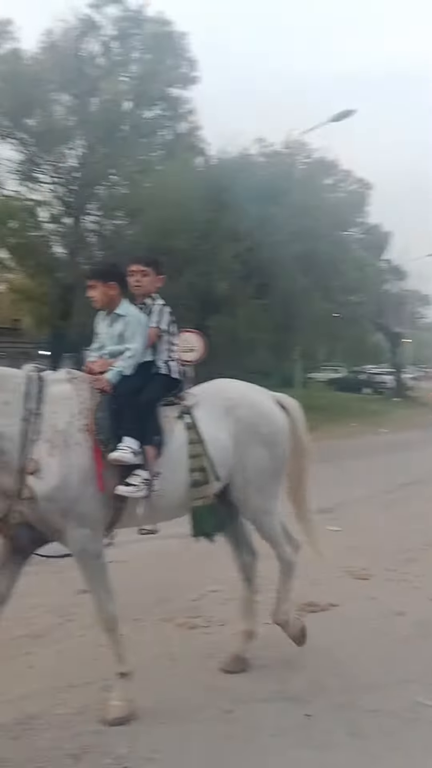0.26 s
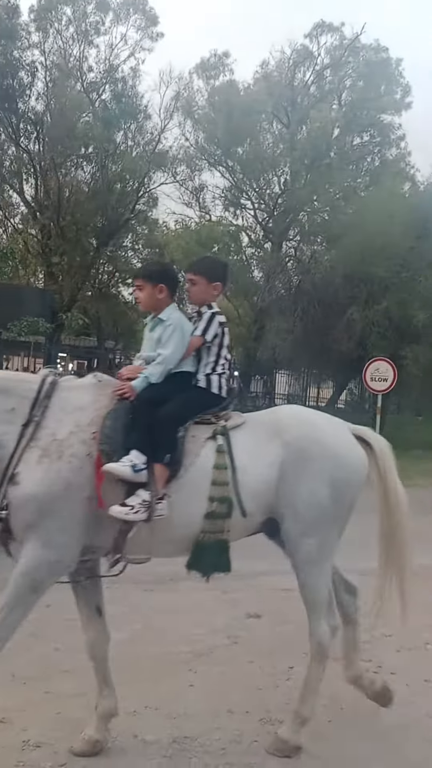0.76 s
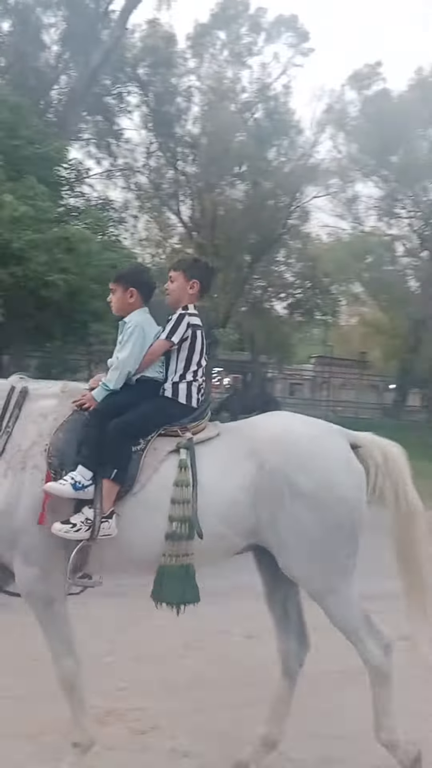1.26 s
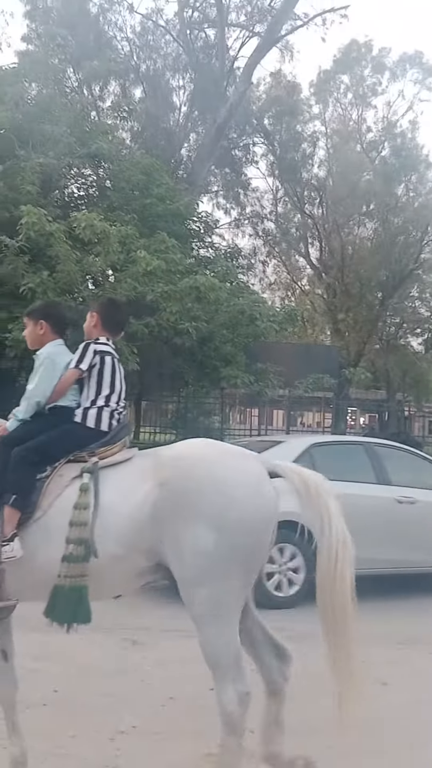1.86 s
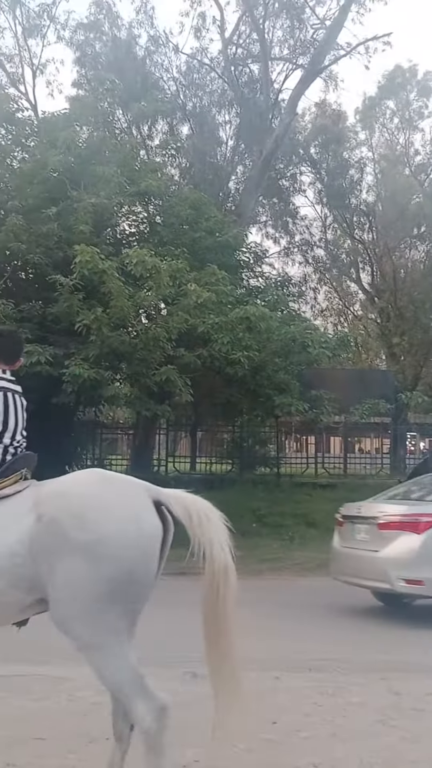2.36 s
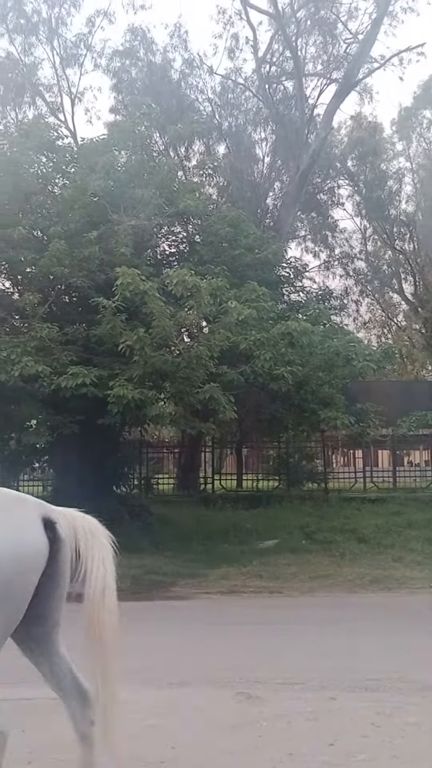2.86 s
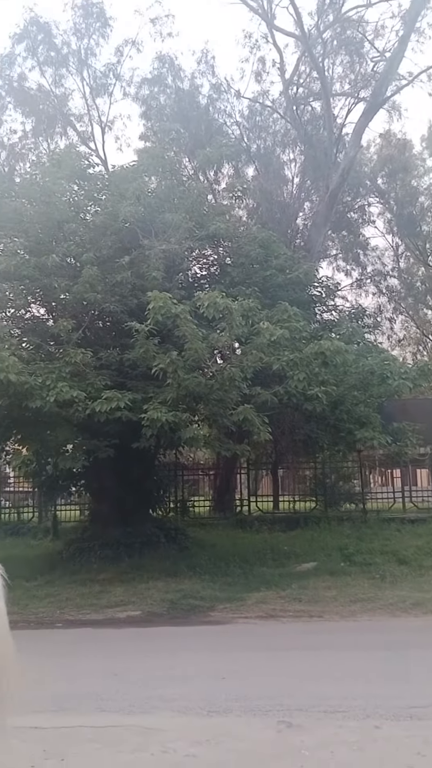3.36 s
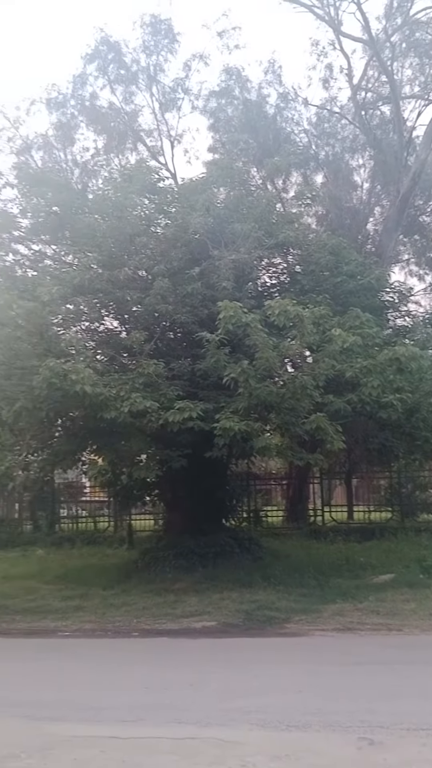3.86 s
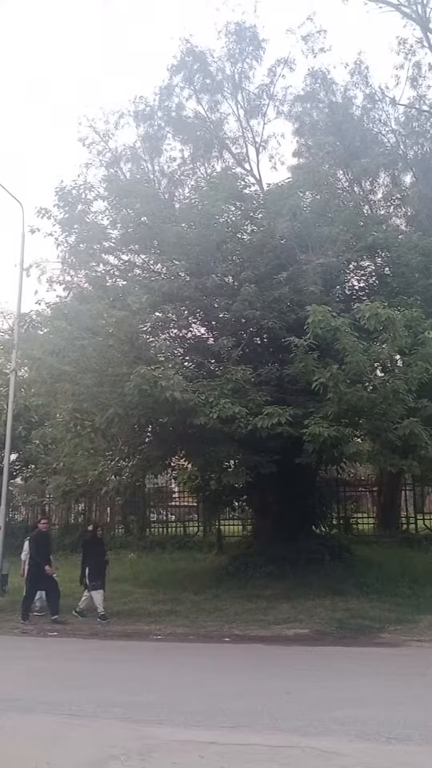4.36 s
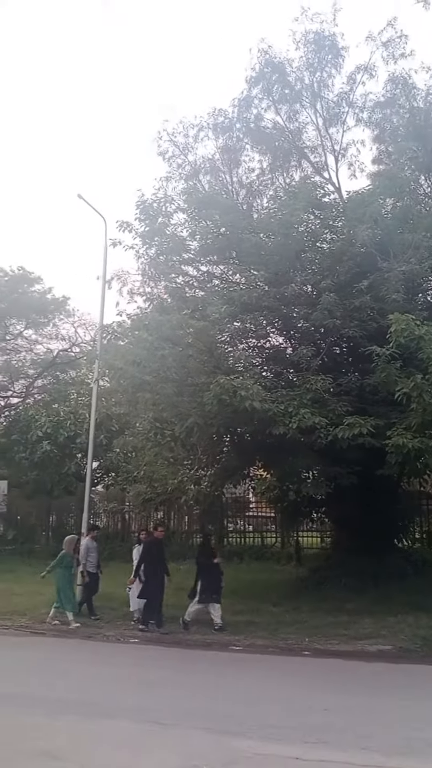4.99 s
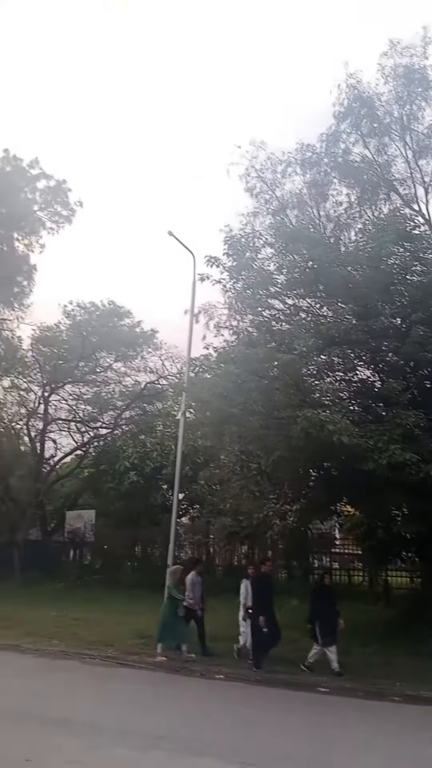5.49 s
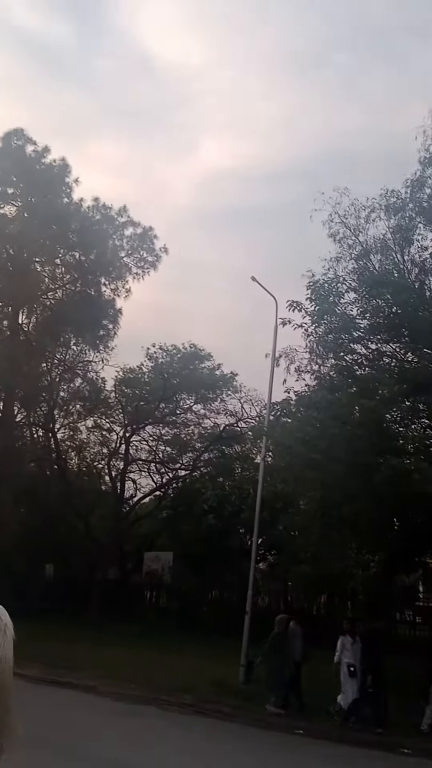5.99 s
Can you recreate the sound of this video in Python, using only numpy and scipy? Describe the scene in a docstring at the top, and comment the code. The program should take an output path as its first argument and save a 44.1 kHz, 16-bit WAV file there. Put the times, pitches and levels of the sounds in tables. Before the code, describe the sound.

A horse's hooves knock and scuff on gritty ground nearby while a slow engine throbs and fades and a car hisses past.

```python
"""A slow one-cylinder engine throbs along a park road, each firing a puff that rings its exhaust,
over the roar of car tyres and a far rumble. From the first moment a walking horse knocks its hooves
and scuffs grit close to the phone. After about a second a car rolls by with a climbing hiss, then
a faint whine. The throb slows, blurs and fades as the engine draws away, and from about four seconds
on the horse's steps clack faintly, farther off."""
import sys
import numpy as np
from scipy import signal
from scipy.fft import rfft, irfft
from scipy.io import wavfile
from scipy.ndimage import uniform_filter1d, map_coordinates

SR = 44100
rng = np.random.default_rng(int(sys.argv[2]) if len(sys.argv) > 2 else 0)


def persist_wave(psi):
    """Save psi, clipped to +-1, as 16-bit WAV."""
    counts = np.round(np.clip(psi, -1, 1) * 32767).astype(np.int16)
    wavfile.write(sys.argv[1], SR, np.atleast_2d(counts).T)


N = 274986


def gain_of(db):
    """Turns decibels into a number to multiply by."""
    return 10 ** (np.asarray(db) / 20)


def evened(x):
    """Scales a signal to an average strength (rms) of 1."""
    return x / np.sqrt(np.mean(x ** 2) + 1e-20)


def colour_at(colour, hz):
    """The gain at each frequency for a colour: a table of how strong the lows and highs are."""
    f, db = np.transpose(colour)
    return gain_of(np.interp(np.log(hz + 1), np.log(f + 1), db, -100, -100))


def follow(rows, t):
    """Draws straight lines between a table's rows: one curve per column, at times t."""
    times, *columns = np.transpose(rows)
    return [np.interp(t, times, column) for column in columns]


def add(mix, start, sound):
    """Mixes a sound in at a start time in seconds."""
    part = mix[round(start * SR):][:len(sound)]
    part += sound[:len(part)]


def fade_in(t, rise):
    """A smooth start that takes about `rise` seconds."""
    return 1 - np.exp(-(t / rise) ** 2)


def ring(x, hz, width):
    """A resonance: keeps the sound near one pitch, which may slide."""
    turn = np.exp(2j * np.pi * np.cumsum(hz * np.ones(len(x))) / SR)
    decay = np.exp(-np.pi * width / SR)
    return (turn * signal.lfilter([1 - decay], [1, -decay], x / turn)).real


def pitched_noise(length, hz, width):
    """Noise rung twice at one pitch becomes a rough, wavering tone."""
    return evened(ring(ring(rng.standard_normal(length), hz, width), hz, width))


def coloured(x, colour, lo, hi):
    """The part of x between lo and hi Hz, given a colour and evened."""
    hz = np.fft.rfftfreq(len(x), 1 / SR)
    return evened(irfft(rfft(x) * colour_at(colour, hz) * (hz >= lo) * (hz < hi), len(x)))


# How much a noise flickers at each pitch: (frequency [Hz], depth at scale 1 [dB])
FLICKER_DEPTH = [(300, 7), (1000, 2.5), (3000, 5.5), (7000, 9.5), (15000, 4.5)]
def mottled(x, scale):
    """Makes narrow bands of a sound swell and sink for a few hundredths of a second."""
    hz, _, spectrum = signal.stft(x, SR, nperseg=512, noverlap=384)
    streaks = rng.standard_normal(spectrum.T.shape).T
    streaks = evened(uniform_filter1d(uniform_filter1d(streaks, size=2, axis=0), size=12, axis=1))
    depth_db, = follow(FLICKER_DEPTH, hz)
    spectrum *= gain_of(scale * depth_db[:, None] * streaks)
    out = signal.istft(spectrum, SR, nperseg=512, noverlap=384)[1][:len(x)]
    return out * np.sqrt(np.mean(x ** 2) / np.mean(out ** 2))


def drifting_noise(colour, bands, levels, size, patchy_db, flicker_db):
    """Coloured noise; each band follows its own level column, with random patches and flicker."""
    frames, hz = 4 * N // size + 5, np.fft.rfftfreq(size, 1 / SR)
    real, imag, patches = rng.standard_normal((frames, len(hz), 3)).T
    patches = evened(uniform_filter1d(uniform_filter1d(patches, size=7, axis=0), size=9, axis=1))
    flicker = evened(uniform_filter1d(rng.standard_normal(frames), size=4))
    gains = colour_at(colour, hz)
    own_db = [10 * np.log10(np.sum(gains[(hz >= lo) & (hz <= hi)] ** 2)) for lo, hi in bands]
    lift_db = np.array(follow(levels, np.arange(frames) * size / 4 / SR)) - np.c_[own_db]
    place = np.interp(hz, np.ravel(bands), np.repeat(np.arange(len(bands)), 2))
    blend = np.clip(1 - abs(place[:, None] - np.arange(len(bands))), 0, 1)  # fades from band to band
    level_db = blend @ lift_db + patchy_db * patches + flicker_db * flicker
    spectrum = (real + 1j * imag) * gains[:, None] * gain_of(level_db)
    return signal.istft(spectrum, nperseg=size, noverlap=3 * size // 4)[1][:N]


def blows(rows, rise, roughness, spread):
    """Each blow is a tone roughened by noise of like pitch; it drops 60 dB in its fade time."""
    out, t = np.zeros(N), np.arange(SR // 3) / SR
    for start, db, hz, fade in rows:
        tone = np.sin(2 * np.pi * hz * t) + roughness * pitched_noise(len(t), hz, spread * hz)
        add(out, start, gain_of(db - 60 * t / fade) * tone * fade_in(t, rise))
    return out


def swells(rows):
    """Each row is a pitched noise that swells and dies away."""
    out = np.zeros(N)
    for start, end, hz, width, db in rows:
        tone = pitched_noise(round((end - start) * SR), hz, width)
        add(out, start, gain_of(db) * tone * signal.windows.tukey(len(tone), .6))
    return out


# How fast the throb is as the engine passes and draws away: (time [s], firing rate [Hz])
THROB_RATE = [(0, 27.56), (.36, 27.56), (.82, 27.62), (1.0, 28), (1.58, 27.77), (2.0, 27.55), (2.4, 27.17),
              (3.25, 26.45), (4.3, 26.09), (6.24, 24.43)]
# The exhaust's level, dipping briefly now and then: (time [s], low boom [dB], higher bark [dB])
EXHAUST_LEVELS = [(0, -29, -58), (.21, -31.5, -46.5), (.33, -27.5, -42), (.82, -28, -34),
                  (.97, -30.5, -36.5), (1.58, -37, -40.5), (1.93, -37, -43), (2.0, -58, -43),
                  (2.07, -36, -46), (2.27, -37.5, -42.5), (2.4, -43, -55), (2.52, -36, -44),
                  (2.68, -42, -50.5), (2.82, -35.5, -52), (2.91, -43.5, -48.5), (3.2, -37, -45.5),
                  (3.33, -52, -49), (3.51, -41.5, -47), (3.64, -44.5, -54), (3.72, -72, -58.5),
                  (3.87, -49.5, -55.5), (3.92, -64, -60), (4.1, -42, -45.5), (4.19, -67, -64),
                  (4.28, -53, -59.5), (4.49, -71.5, -49.5), (4.55, -50, -73), (4.62, -67, -81),
                  (4.69, -56, -46), (4.79, -45, -73), (4.86, -75, -82), (4.93, -38.5, -74), (5.0, -66, -82),
                  (6.24, -74, -84)]
# How the exhaust rings, boom then bark: (pitch [Hz], width [Hz], delay [s], ease of blurring [factor])
EXHAUST_RINGS = [(139.4, 20.6, 0.01296, 0.61), (317.8, 35.5, 0.01104, 1.17)]
def engine():
    """One puff per firing rings the exhaust; the valves rustle in step; distance blurs the beat."""
    t, f = np.arange(N) / SR, np.fft.rfftfreq(N, 1 / SR)
    rate_hz, = follow(THROB_RATE, t)
    boom_db, bark_db = follow(EXHAUST_LEVELS, t)
    cycles = 0.058 + np.cumsum(rate_hz) / SR
    strength = -gain_of(0.7 * rng.standard_normal(200))[cycles.astype(int)]
    fires = np.diff(np.floor(cycles), prepend=-1) > 0
    puffs = evened(strength * fires)
    puffs = evened(puffs + 0.11 * np.roll(puffs, round(0.01437 * SR)))  # an echo behind each beat
    blur = 0.045 + 0.2 * np.maximum(t - 0.9, 0)  # echo noise takes over as the engine leaves
    noise = rng.standard_normal(N)
    rings = []
    for hz, width, delay, ease in EXHAUST_RINGS:
        noise_share = np.clip(ease * blur, 0, 1)
        drive = np.sqrt(1 - noise_share) * puffs + np.sqrt(noise_share) * noise
        # many chambers in a row: each beat swells and dies roundly
        chambers = np.exp(-.5 * ((f - hz) / width) ** 2 - 2j * np.pi * f * delay)
        rings.append(evened(irfft(rfft(drive) * chambers, N)))
    boom, bark = rings
    pulse = np.exp(0.59 * np.cos(2 * np.pi * (cycles - .15)))
    # the rustle and rasp borrow the colours of the grit and tyres below
    rustle = evened(pulse * coloured(mottled(rng.standard_normal(N), 1.2), GRIT_COLOUR, 2600, 14000))
    rasp = evened(pulse * coloured(rng.standard_normal(N), TYRE_COLOUR, 700, 3000))
    body = boom + gain_of(-47.0) * rustle + gain_of(-31.5) * rasp
    return gain_of(boom_db) * body + gain_of(bark_db) * bark


# The colour of tyre noise: (frequency [Hz], relative level [dB])
TYRE_COLOUR = [(240, -47.5), (400, -14), (772, -32), (972, -1), (1100, -2), (1190, -6.5), (1540, 3),
               (1850, 1), (2250, -14.5), (2970, -25.5), (4770, -63.5), (5480, -40), (7790, -20.5),
               (9350, -43.5), (15500, -48.5)]
# The four bands of tyre noise, low to high: (from [Hz], to [Hz])
TYRE_BANDS = [(800, 1280), (1350, 2150), (2300, 3500), (6000, 9500)]
# Their levels: (time [s], roar [dB], tread hiss [dB], near-car hiss [dB], fine hiss [dB])
TYRE_LEVELS = [(0, -46.5, -47.5, -68.5, -93), (0.401, -48.5, -50, -69, -90), (.9, -44, -50, -65.5, -75),
               (1.3, -42.5, -48, -63, -69), (2.2, -51.5, -49, -63, -73), (3.149, -45.5, -47.5, -63, -78),
               (3.629, -48, -50.5, -68.5, -87), (4.4, -52.5, -50.5, -74, -83),
               (6.24, -45, -45.5, -76.5, -74.5)]
def tyres():
    """Car tyres rolling on the road make a flickering roar and hiss."""
    roar = drifting_noise(TYRE_COLOUR, TYRE_BANDS, TYRE_LEVELS, size=512, patchy_db=0.5, flicker_db=-1.63)
    return mottled(roar, 0.88)


def ground_echo(x, delay_s=0.0028, wander_s=0.458, strength=.55):
    """The ground's echo cancels some pitches; they shift as the cars move and its delay changes."""
    wander = rng.standard_normal(N)
    for _ in range(2):
        wander = uniform_filter1d(wander, size=round(wander_s * SR))
    delay = delay_s * SR * np.exp(0.1835 * evened(wander - wander.mean()))
    echo = map_coordinates(x, [np.arange(N) - delay], order=3)
    return (x + strength * echo) / np.sqrt(1 + strength ** 2)


# The colour of far traffic and light wind: (frequency [Hz], relative level [dB])
RUMBLE_COLOUR = [(12, -53), (20, -33.5), (129, -3), (189, -10), (293, 0), (428, -9.5), (554, -6.5),
                 (706, -13.5), (750, -8), (980, -60.5), (1650, -120)]
# The rumble's level in three bands: (time [s], deep [dB], middle [dB], upper [dB])
RUMBLE_LEVELS = [(0, -51, -59.5, -63), (1.2, -53, -57, -65.5), (2.2, -67, -63, -69), (3.4, -62.5, -70, -73),
                 (4.84, -75.5, -73, -68.5), (6.24, -64, -76, -69)]
def far_rumble():
    """Far traffic and light wind blend into a low, uneven noise."""
    bands_hz = [(30, 69), (190, 194.6), (410, 1700)]
    return drifting_noise(RUMBLE_COLOUR, bands_hz, RUMBLE_LEVELS, size=2048, patchy_db=3.5, flicker_db=3.0)


# The colour of the microphone's hiss: (frequency [Hz], relative level [dB])
MICROPHONE_COLOUR = [(1940, -22), (3300, 1.5), (4690, -2), (7810, -5), (9250, -23.5), (9940, -3.5),
                     (15700, -38)]
def microphone_hiss(top_db=-96.5):
    """The microphone adds a steady thin hiss; top_db sets the part above 9.5 kHz."""
    hz = np.fft.rfftfreq(N, 1 / SR)
    gains = colour_at(MICROPHONE_COLOUR, hz)
    gains /= np.sqrt(np.mean((gains * (hz > 9500)) ** 2))
    return gain_of(top_db) * irfft(rfft(rng.standard_normal(N)) * gains, N)


# The colour of grit, loose or scuffed: (frequency [Hz], relative level [dB])
GRIT_COLOUR = [(1180, -22), (2000, 15), (2320, -3), (3030, 6), (3510, -7.5), (4140, -7.5), (4710, -33),
               (5500, -20), (7200, -7.5), (9300, -17), (10200, -14.5), (11300, -18), (12700, -15.5),
               (14200, -25), (15900, -34)]
# The hiss of loose grit: (from [Hz], to [Hz], starting level [dB], change [dB/s])
LOOSE_GRIT_BANDS = [(6980, 10000, -69, -5), (9500, 15500, -79, -5.5)]
def loose_grit(shifts_per_s=12):
    """Loose grit shifts with a soft hiss and small random swells, fading as the horse walks off."""
    t = np.arange(N) / SR
    shifts = (rng.random(N) < shifts_per_s / SR) * gain_of(1.5 * np.minimum(rng.exponential(1, N), 3))
    swell = signal.oaconvolve(shifts, np.hanning(1400))[:N]
    hiss = (.6 + swell) * mottled(rng.standard_normal(N), .9)
    return sum(gain_of(db + db_per_s * t) * coloured(hiss, GRIT_COLOUR, lo, hi)
               for lo, hi, db, db_per_s in LOOSE_GRIT_BANDS)


# Grit under a hoof: (time [s], rise [s], fade time [s], dull [dB], middle [dB], bright [dB])
HOOF_SCUFFS = [(0.043, 0.001, 0.037, -75, -63.5, -44), (.100, 0.0053, 0.069, -51.5, -52.5, -51),
               (.180, 0.0032, 0.031, -72, -56, -49), (.262, 0.0012, 0.061, -59, -41, -41.5),
               (.358, 0.0052, 0.065, -55, -56, -65), (.394, 0.0064, 0.095, -60, -60, -61),
               (.436, 0.0041, 0.056, -58, -58, -51), (0.472, 0.0027, 0.065, -56.5, -54, -55.5),
               (.620, 0.0034, 0.061, -74, -64, -59), (0.634, 0.0039, 0.043, -57, -43.5, -43),
               (0.655, 0.0026, 0.049, -69, -58, -53), (0.929, 0.0016, 0.056, -67, -64, -59.5),
               (1.0217, 0.00057, 0.024, -80, -51, -46.5), (1.1433, 0.0013, 0.06, -42, -48.5, -52.5),
               (1.254, 0.0022, 0.053, -54, -56, -67), (1.411, 0.00052, .03, -40, -50, -70),
               (1.421, 0.0011, 0.078, -57, -53, -69), (1.7, 0.0017, 0.027, -64, -40.5, -57),
               (1.709, 0.0013, 0.024, -38, -35.5, -38), (1.716, .006, 0.066, -49, -53, -52),
               (1.872, 0.0029, 0.059, -75, -55, -80), (1.888, 0.00081, 0.05, -87, -54.5, -59),
               (2.1223, 0.0036, 0.068, -65, -58, -73), (2.203, 0.008, 0.055, -36, -45, -44),
               (2.469, 0.0025, 0.047, -47.5, -55, -88), (2.617, 0.0025, 0.2, -69, -60, -65),
               (2.6772, 0.008, 0.18, -51, -60, -86), (2.733, 0.0032, 0.15, -52, -56, -71),
               (2.7622, 0.00055, 0.01, -35, -48, -60), (3.11, 0.029, 0.27, -73, -58, -83),
               (3.14, 0.0042, 0.035, -61, -51, -70), (3.192, 0.0055, 0.032, -70, -54, -61),
               (3.277, 0.00055, .018, -75, -43.5, -56), (3.286, 0.016, 0.073, -40, -41.5, -39),
               (3.342, 0.012, 0.095, -66, -57, -67), (3.546, 0.0083, 0.069, -72, -53, -62),
               (3.870, 0.006, 0.03, -68, -55.5, -60), (4.219, 0.0018, 0.024, -53, -62, -91),
               (4.407, 0.012, 0.098, -76, -55, -69), (4.789, 0.0017, 0.086, -72, -60.5, -85),
               (4.9736, 0.0034, 0.11, -65, -61, -73), (5.497, 0.0026, 0.17, -70, -62, -65),
               (6.18, 0.0016, 0.055, -71, -53, -82)]
# How each part stretches that fade time: (dull [factor], middle [factor], bright [factor])
FADE_STRETCH = [1.67, 1.15, 0.62]
def hoof_scuffs(snap_below_s=0.0051):
    """A hoof crunches grit: a snap if it strikes quickly, otherwise a soft spray."""
    out, t = np.zeros(N), np.arange(SR // 5) / SR
    noise = rng.standard_normal(N)
    crunch_db = 3 * uniform_filter1d(rng.standard_normal(N), size=60) * np.sqrt(60)
    grains = mottled(noise * gain_of(crunch_db), 0.9)
    parts = [coloured(grains, GRIT_COLOUR, lo, hi) for lo, hi in [(0, 4800), (4800, 9700), (9700, SR)]]
    snap = 2.8 * np.exp(-t / 0.00087) * fade_in(t, 0.0015)
    for start, rise, fade, *levels_db in HOOF_SCUFFS:
        quickness = max(1 - rise / snap_below_s, 0)
        for part, stretch, db in zip(parts, FADE_STRETCH, levels_db):
            spray = gain_of(-60 * (t / (rise + stretch * fade)) ** 1.2) * fade_in(t, rise)
            piece = part[round(start * SR):][:len(t)]
            shape = (spray + quickness * snap)[:len(piece)]
            scuff = piece * shape
            add(out, start, gain_of(db) * scuff * np.linalg.norm(shape) / np.linalg.norm(scuff))
    return out


# Hoof blows on hard ground: (time [s], level [dB], pitch [Hz])
HOOF_KNOCKS = [(.045, -27, 863), (0.265, -30.5, 1170), (1.054, -32.5, 977), (1.089, -31.5, 960),
               (1.146, -34.5, 935), (1.415, -35, 1020), (1.585, -34.5, 1200), (1.7, -28, 1124),
               (2.207, -38.5, 990), (2.219, -33.5, 1135), (2.235, -33.5, 1025), (2.469, -31, 1080),
               (2.484, -30, 997), (2.614, -33, 1030), (2.763, -29.5, 1070), (3.14, -33, 1120),
               (3.151, -33.5, 1026), (3.277, -35, 1064), (4.222, -45, 2350), (4.428, -32.5, 1020),
               (4.713, -32.5, 1092), (4.793, -35, 1055)]
def hoof_knocks(half_blow_s=0.0024, fade_s=0.21):
    """A hoof lands with a short hollow clop, then a weaker rough ring."""
    out, t = np.zeros(N), np.arange(SR // 10) / SR
    for start, db, hz in HOOF_KNOCKS:
        rough = pitched_noise(len(t), hz, 0.17 * hz)
        clop = np.exp(-((t - 1.22 * half_blow_s) / half_blow_s) ** 2) * np.sin(2 * np.pi * hz * t)
        tail = 0.28 * gain_of(-60 * t / fade_s) * fade_in(t, 0.0056) * rough
        add(out, start, gain_of(db) * (clop + tail))
    return out


# Soft dull bumps: (time [s], level [dB], pitch [Hz])
SOFT_BUMPS = [(0.102, -50.5, 523), (1.071, -45.5, 493), (1.211, -44, 497), (3.24, -38, 71),
              (5.898, -47.5, 484), (5.973, -43, 147)]
def soft_bumps(fade_s=0.31):
    """Low tones start gently and soon die away."""
    return blows([(*row, fade_s) for row in SOFT_BUMPS], rise=0.0085, roughness=0.29, spread=0.11)


# Brief swells in the road noise: (start [s], end [s], pitch [Hz], level [dB])
ROAD_SWELLS = [(0.206, 0.232, 7970, -57.5), (0.275, 0.685, 1002, -46), (0.324, 0.47, 1352, -50),
               (0.317, 0.385, 2250, -55.5), (0.423, .57, 1580, -47.5), (0.515, 0.633, 2210, -54.5),
               (0.597, 0.673, 817, -48), (0.725, .84, 1780, -50), (.84, 0.983, 1845, -46.5),
               (0.841, 0.945, 926, -43.5), (.89, 1.09, 1210, -50.5), (0.942, 1.3, 1002, -53),
               (1.189, 1.476, 2580, -54.5), (1.508, 1.93, 2710, -55), (1.95, 2.143, 2536, -58)]
def road_swells():
    """Narrow bands of the road noise stand out for a moment."""
    return swells([(start, end, hz, 50 + 0.026 * hz, db) for start, end, hz, db in ROAD_SWELLS])


# Scrapes of a hoof: (start [s], end [s], pitch [Hz], width [Hz], level [dB])
HOOF_DRAGS = [(.55, .6, 3080, 900, -64), (1.34, 1.4, 5260, 1500, -69), (1.37, 1.45, 3400, 910, -64),
              (2.68, 2.81, 2390, 497, -52), (2.72, 2.81, 3600, 596, -62)]
def hoof_drags():
    """A hoof dragging over the ground makes a short swish."""
    return swells(HOOF_DRAGS)


# The passing car's hiss: (time [s], pitch [Hz], level [dB])
CAR_HISS = [(1.101, 2540, -74), (1.3, 2610, -51), (1.5, 2680, -60), (1.65, 3010, -73), (1.85, 2910, -62),
            (2.1, 3070, -59), (2.4, 3120, -68), (2.9, 2920, -75)]
# Its faint whines: (start [s], end [s], pitch [Hz], level [dB])
CAR_WHINES = [(1.898, 2.912, 3125, -65), (2.0, 2.65, 3512, -70.5)]
def passing_car(hiss_width_hz=210, whine_width_hz=20):
    """A car rolls by: its hiss climbs in pitch, and thin wavering whines join in."""
    t = np.arange(CAR_HISS[0][0], CAR_HISS[-1][0], 1 / SR)
    hiss_hz, hiss_db = follow(CAR_HISS, t)
    noise = mottled(rng.standard_normal(len(t)), 0.87)
    hiss = ring(ring(noise, hiss_hz, hiss_width_hz), hiss_hz, hiss_width_hz)
    out = swells([(start, end, hz, whine_width_hz, db) for start, end, hz, db in CAR_WHINES])
    add(out, t[0], gain_of(hiss_db) * evened(hiss))
    return out


# Far steps on the asphalt: (time [s], base level [dB])
FAR_STEPS = [(4.224, -70.5), (4.713, -74), (4.789, -70.5), (4.974, -74), (5.289, -66.5), (5.5, -65),
             (5.849, -71)]
# The tones of a struck hoof: (pitch [Hz], level added to the base [dB], fade time [s])
HOOF_TONES = [(2380, 10, 0.11), (3195, 4.5, 0.14), (3850, -2.5, 0.077), (5580, -1.5, 0.1)]
def far_steps():
    """Every far step rings the same few tones of the hoof, making a clack."""
    rows = [(start, db + tone_db, hz, fade) for start, db in FAR_STEPS for hz, tone_db, fade in HOOF_TONES]
    return blows(rows, rise=0.0017, roughness=0.91, spread=0.053)


def scene():
    """Adds the engine, road, horse and background into one channel."""
    road = tyres()
    background = far_rumble() + road_swells() + soft_bumps()
    horse = hoof_knocks() + hoof_scuffs() + hoof_drags() + loose_grit() + far_steps()
    traffic = engine() + ground_echo(road) + passing_car()
    return (traffic + horse + background + microphone_hiss())[None]


def record(dry, bass_hz=55, dead_spot_hz=4850, top_hz=15950):
    """The phone cuts deep bass, has a dead spot in the treble and loses the very highest sounds."""
    thin = signal.sosfilt(signal.butter(2, bass_hz, "high", fs=SR, output="sos"), dry)
    notched = thin - 1.1 * ring(thin[0], dead_spot_hz, width=1100)
    top_cut = signal.firwin(511, top_hz, window=("kaiser", 9), fs=SR)
    return signal.oaconvolve(notched, top_cut[None], "same")


dry = scene()
out = record(dry)
persist_wave(out)
```